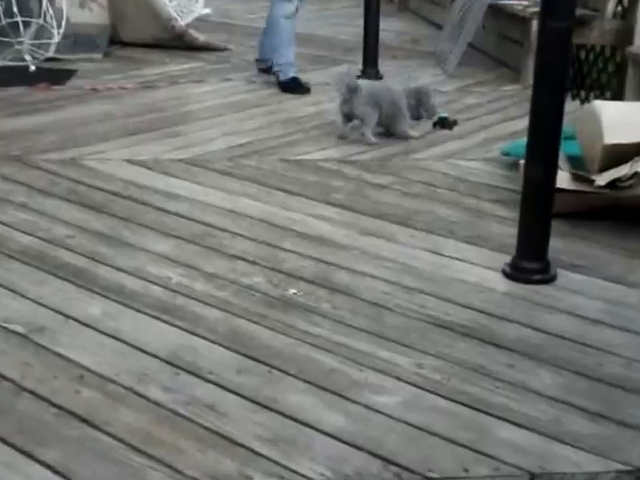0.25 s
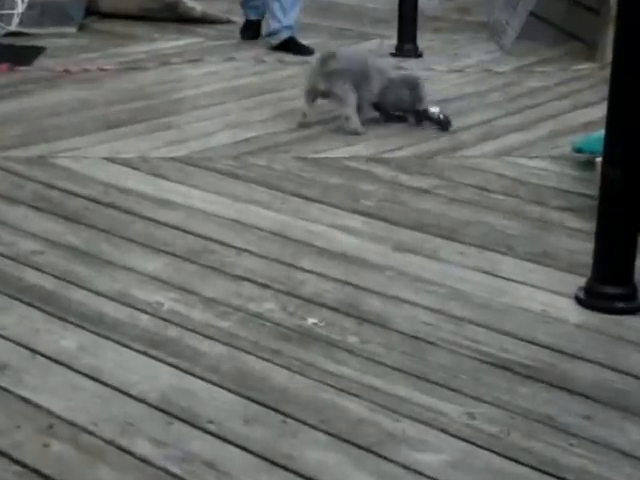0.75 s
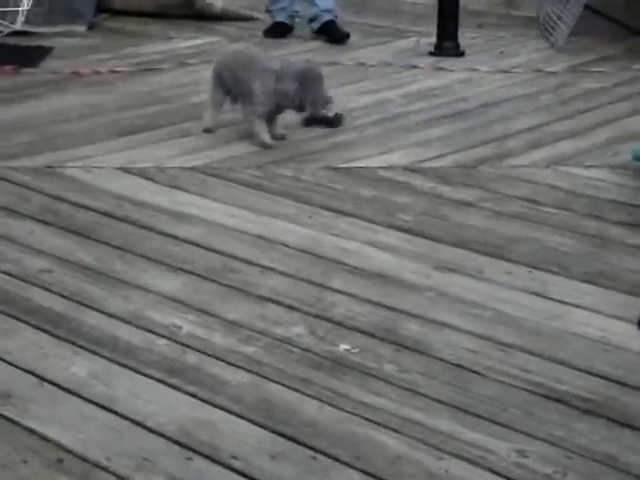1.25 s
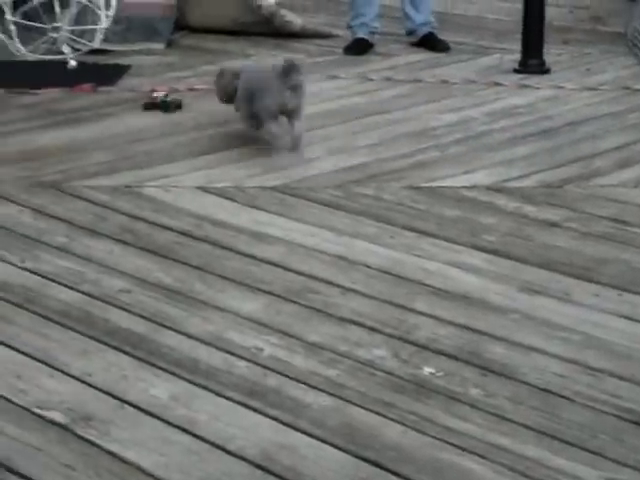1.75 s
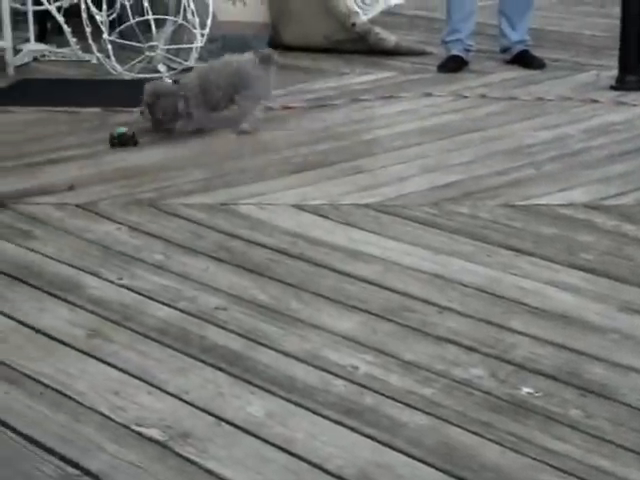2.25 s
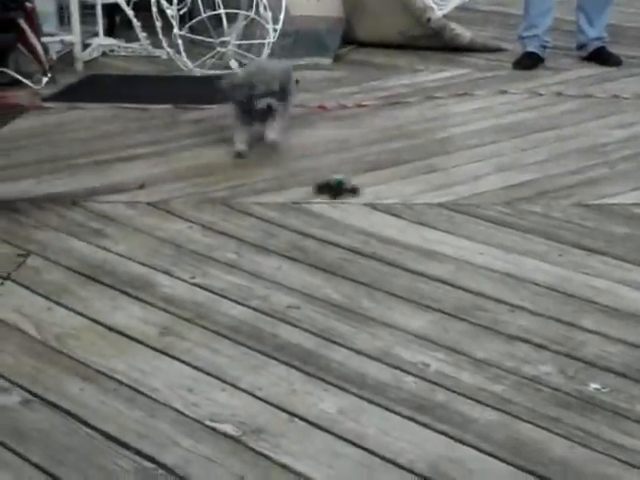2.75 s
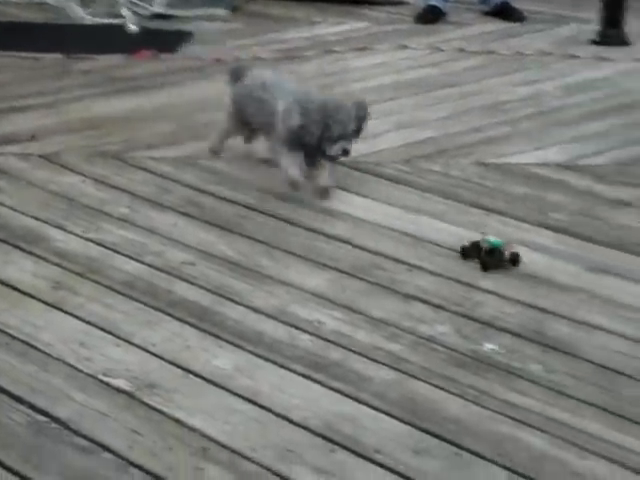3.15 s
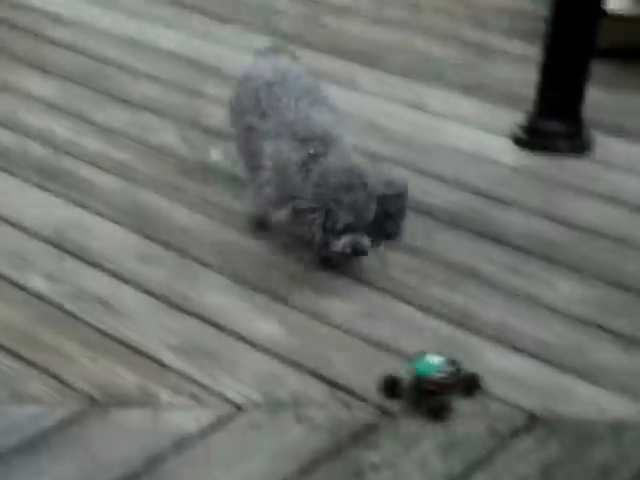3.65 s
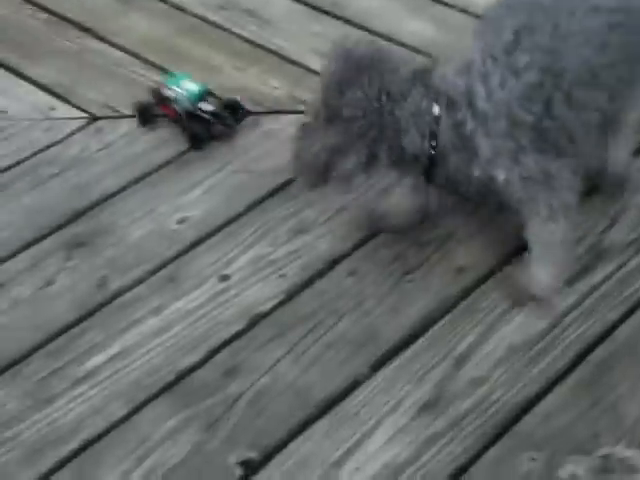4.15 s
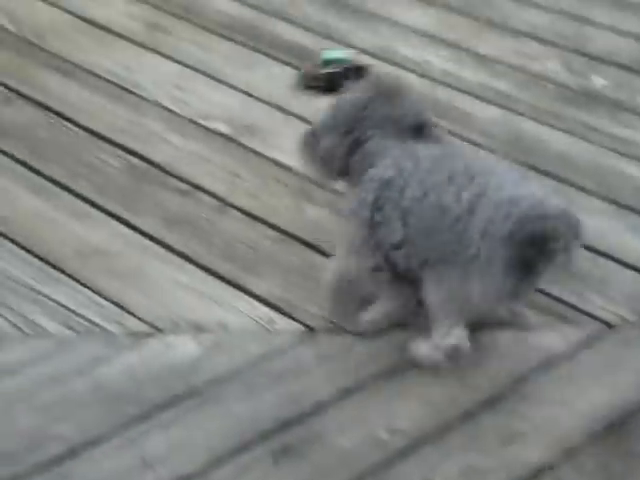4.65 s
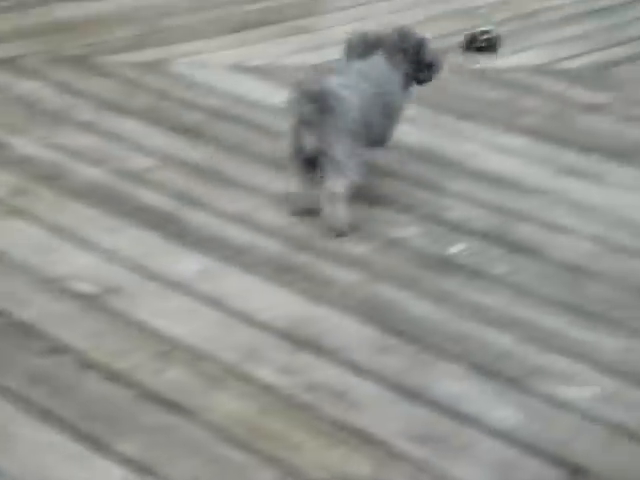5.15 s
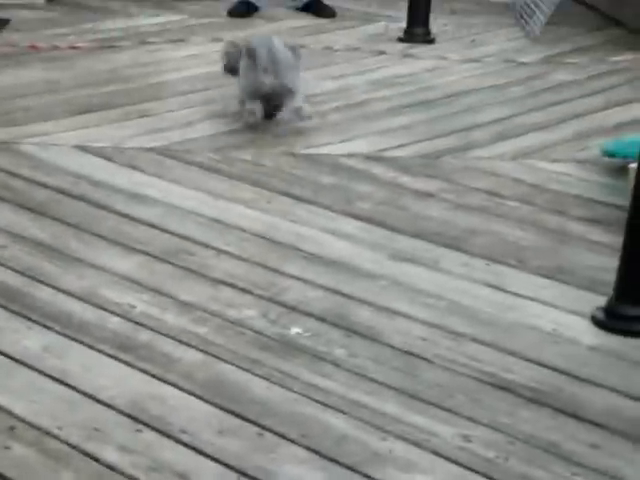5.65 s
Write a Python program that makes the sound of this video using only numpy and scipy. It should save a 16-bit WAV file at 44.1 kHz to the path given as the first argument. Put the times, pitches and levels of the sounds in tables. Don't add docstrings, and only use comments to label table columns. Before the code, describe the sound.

High, bright barks in quick twos over the whirring, clattering run of a small motorized toy on a wooden deck, with overloaded, wind-buffeted sound.

```python
import sys
import numpy as np
from scipy import signal
from scipy.fft import rfft, irfft
from scipy.io import wavfile
from scipy.ndimage import uniform_filter1d

SR = 44100
rng = np.random.default_rng(int(sys.argv[2]) if len(sys.argv) > 2 else 0)


def persist_wave(psi):
    counts = np.round(np.clip(psi, -1, 1) * 32767).astype(np.int16)
    wavfile.write(sys.argv[1], SR, np.atleast_2d(counts).T)


def gain_from_db(level_db):
    decades = np.asarray(level_db, float) / 20
    return 10 ** decades


N = 259302


def evened(x):
    return x / np.sqrt(np.mean(x ** 2) + 1e-20)


def band(x, lo_hz, hi_hz, order=2):
    return signal.sosfilt(signal.butter(order, [lo_hz, hi_hz], "band", fs=SR, output="sos"), x)


def coloured(points):
    points_hz, points_db = np.transpose(points)
    hz = np.fft.rfftfreq(N, 1 / SR)
    gain = gain_from_db(np.interp(np.log(hz + 1), np.log(points_hz), points_db, -90, -90))
    return evened(irfft(rfft(rng.standard_normal(N)) * gain, N))


def drift(count, size):
    return evened(uniform_filter1d(uniform_filter1d(rng.standard_normal(count), size), size))


def add(mix, s, sound):
    part = mix[round(s * SR):][:len(sound)]
    part += sound[:len(part)]


def resonate(x, hz, width_hz):
    turn = np.exp(2j * np.pi * np.cumsum(hz * np.ones(len(x))) / SR)
    r = np.exp(-np.pi * width_hz / SR)
    return 2 * (turn * signal.lfilter([1 - r], [1, -r], x / turn + 1e-18)).real


def swells(events):
    t = np.arange(N) / SR
    return sum(db * np.exp(-((t - s) / length_s) ** 2) for s, db, length_s in events)


# middle in seconds, rise over the breeze in dB, length in seconds.
GUSTS = [(.1, 15, 0.23), (.54, 17, 0.17), (.77, 11.5, 0.08), (.97, 20, 0.14), (1.15, 11, 0.091),
         (1.32, 14.5, 0.038), (1.5, 12.5, 0.083), (1.72, 4, .05), (2.1, 11, 0.45), (3.12, 4.5, 0.092),
         (3.3, 6.5, 0.041), (3.53, 12, 0.033), (3.72, 9.5, 0.15), (4.6, 5, 0.13), (5.0, 5, 0.073),
         (5.35, 5.5, 0.066), (5.77, 4, 0.05)]


def wind():
    wind_db = -36.5 + swells(GUSTS)
    rumble = band(rng.standard_normal(N), 11.0, 86) * gain_from_db(0.5 * drift(N, size=2000))
    return gain_from_db(wind_db - 6.55) * evened(rumble)


# middle in seconds, rise over the rumble in dB, length in seconds.
PAWS = [(.06, -3, 0.11), (.67, 2.5, 0.2), (.89, -1, 0.03), (1.2, 4.5, 0.046), (1.54, 2.5, 0.051),
        (1.7, 9, 0.035), (2.2, 5, 0.045), (2.87, 5, 0.16), (3.2, 5.5, 0.021), (3.45, 5, .06),
        (3.54, 8.5, 0.061), (3.704, 15, 0.051), (3.85, 13, 0.098), (4.682, 20, 0.041), (4.88, 8, 0.14),
        (5.3, 1, 0.31), (5.78, 8, 0.018)]


def planks():
    planks_db = -38 + swells(PAWS)
    drumming = band(rng.standard_normal(N), 110, 262.5) * gain_from_db(1.9 * drift(N, size=500))
    return gain_from_db(planks_db + 0.5) * evened(drumming)


# middle in seconds, rise in dB, length in seconds.
HUM_SWELL = (1.05, 18, .3)


def plank_hum():
    return gain_from_db(-50.5 + swells([HUM_SWELL])) * evened(resonate(rng.standard_normal(N), 108, 12))


# frequency in Hz, level in dB per Hz.
WHEELS = [(300, -26.5), (450, -9), (700, -10.5), (1200, -5), (1700, -5), (3000, -5.5), (3700, -19.5),
          (4200, -37)]
# time in seconds, nearness in dB, throttle in dB.
TRUCK_RUN = [(0, -27, -25), (0.051, -25.5, -2), (.54, -23.5, 8.5), (.8, -23, 3.5), (0.931, -22, 4.5),
             (1.25, -21.5, -1.5), (1.34, -23.5, 7), (1.5, -28, 1), (1.72, -28.5, 5.5), (2.16, -32, 3.5),
             (2.87, -29, 8), (3.5, -30.5, 6), (3.898, -27.5, 6), (4.5, -27, 8), (4.62, -23.5, 5),
             (4.85, -28, 9), (5.201, -30, 6), (5.88, -36, 10.5)]


def truck():
    s, *columns = np.transpose(TRUCK_RUN)
    wheels_db, throttle_db = (np.interp(np.arange(N) / SR, s, c) for c in columns)
    gears_db = wheels_db + throttle_db + 2.0 * drift(N, size=1800)

    tooth_hz = 212 * (1 + 0.051 * drift(N, size=3000) + 0.23 * drift(N, size=150))
    tooth_turns = np.cumsum(tooth_hz) / SR
    clicks = 1.0 + np.exp(-(tooth_turns % 1) / 1.6)
    chatter = clicks * gain_from_db(1.3 * drift(N, size=300)) * rng.standard_normal(N)
    housing_hz = 2887 * (1 + 0.034 * drift(N, size=2500))
    gears = resonate(resonate(chatter, housing_hz, 590), housing_hz, 1100)

    wheels = coloured(WHEELS) * gain_from_db(1.5 * drift(N, size=250))
    wheels /= np.std(band(wheels, 600, 2100, order=4))
    return gain_from_db(gears_db - 1.8) * evened(gears) + gain_from_db(wheels_db - 1.36) * wheels


SHELL_HZ = 2900


def knock(s, db, hz, t60_s, low_db):
    t = np.arange(3000) / SR
    grit = rng.standard_normal((2, 3000))
    fall = gain_from_db(-60 * t / max(t60_s, .004)) * np.minimum(t / 0.0013, 1)
    ring = np.sin(2 * np.pi * hz * t) + 0.81 * evened(band(grit[0], 1600, 6100))
    tap = evened(band(grit[1], 420, 1900))
    return s, gain_from_db(db) * fall * (0.96 * ring + gain_from_db(low_db) * tap)


def stray_rattles(mix):
    for chance, size, tune in rng.random((80, 3)):
        s = chance * 80 / 8
        add(mix, *knock(s, -28 + 8 * size, SHELL_HZ * (.9 + .2 * tune), 0.028, -11))


# start in seconds, peak in dB, t60 in seconds, low tap share in dB.
JOLTS = [(0.4324, 4, 0.026, -11), (.45, -1, 0.026, -5.5), (0.525, 3, 0.0087, -18),
         (.9263, -21.5, 0.031, -12), (2.1063, -22, 0.15, -17), (2.174, -18.5, 0.048, -14),
         (2.2133, 0.5, 0.067, -12), (2.6783, 17.5, .03, -19), (2.969, -14.5, 0.086, -28),
         (3.029, -10.5, 0.087, -20), (3.041, -13.5, 0.087, -12.5), (3.8018, -7.5, 0.029, -12),
         (3.8482, 0.5, 0.0072, -13), (3.863, -15.5, 0.016, -40), (4.138, -0.5, 0.044, -20),
         (4.1477, 3, 0.04, -23), (4.1706, 2.5, 0.035, -13.5), (4.3988, 9, 0.014, -17),
         (4.4621, -2.5, .01, -19), (4.649, 0, 0.13, -29.5), (4.6661, 7.5, 0.067, -9.5),
         (4.6878, 7.5, 0.055, -9.5), (4.8005, -9, 0.026, -13), (4.8684, -6.5, 0.014, -28),
         (4.931, -11, 0.044, -12), (5.144, -8, 0.022, -18), (4.7716, -8, 0.08, -15),
         (5.457, -13, 0.021, -26.5), (5.7184, -15.5, 0.13, -14.5), (4.378, -10, 0.03, -5)]


def plank_jolts(mix):
    for s, db, t60_s, low_db in JOLTS:
        add(mix, *knock(s, db, SHELL_HZ * (1 + 0.049 * rng.standard_normal()), t60_s, low_db))


# start in seconds, peak in dB, ring in Hz.
CLAWS = [(0.147, 0.5, 2160), (0.2047, 1.5, 2950), (1.953, -17.5, 2950), (3.7025, -13.5, 2720),
         (4.0596, 0.5, 2300), (4.1247, 0, 3080), (4.419, -9, 2790), (4.624, -7, 2980), (5.0121, -8, 1890),
         (5.0385, -9, 2060), (5.5502, -13, 2900)]


def claw_clicks(mix):
    for s, db, hz in CLAWS:
        add(mix, *knock(s, db, hz, t60_s=0.029, low_db=-10))


# start in seconds, length in seconds, level in dB,
# first pitch in Hz, last pitch in Hz.
SQUEALS = [(0.435, 0.019, -9, 3090, 2910), (0.473, 0.056, -10, 3330, 3440), (0.9, 0.031, -14, 2810, 3110),
           (1.257, 0.076, -15, 2910, 2450), (1.322, .05, -19.5, 2670, 4180),
           (1.829, 0.016, -20.5, 3034, 3020), (2.08, 0.053, -18.5, 2343, 3590),
           (2.899, .04, -20, 3100, 3100), (3.025, 0.04, -15.5, 3030, 3260), (3.849, 0.037, -14, 3130, 3010),
           (4.505, .06, -5.5, 2840, 3740), (4.651, 0.022, 1.5, 2730, 2540),
           (5.267, 0.051, -17.5, 3210, 3160), (5.705, 0.033, -1.5, 2800, 2790)]


def squeals(mix, width_hz=350):
    for s, length_s, db, from_hz, to_hz in SQUEALS:
        noise = rng.standard_normal(SR // 10)[:int(length_s * SR)]
        hz = np.linspace(from_hz, to_hz, len(noise))
        glide = resonate(resonate(noise, hz, width_hz), hz, width_hz)
        add(mix, s, gain_from_db(db) * evened(glide) * np.hanning(len(noise)) * 0.96)


# frequency in Hz, width in Hz, level in dB.
THROAT = [(1156, 845, 16), (2950, 680, 8), (2058, 170, -7.5), (3674, 810, 0.5)]
# time in seconds, pitch in Hz.
BARKS = [
    [(.051, 750), (.057, 741), (.073, 987), (.085, 1185), (.106, 1126), (.124, 1171), (.148, 1034),
     (.178, 814)],
    [(.3, 1001), (.31, 1136), (.327, 1285), (.346, 1457), (.366, 1480), (.391, 1430), (.4, 1126),
     (.427, 937.4)],
    [(2.296, 454.5), (2.322, 882), (2.34, 1118), (2.362, 1405), (2.378, 1522), (2.402, 1520), (2.433, 1482),
     (2.447, 1112), (2.474, 875)],
    [(2.595, 881.4), (2.607, 1125), (2.63, 1351), (2.662, 1290), (2.687, 1321), (2.697, 1022), (2.718, 943),
     (2.74, 839)],
    [(3.93, 507.2), (3.946, 765.6), (3.962, 922), (3.979, 1132), (3.997, 1444), (4.01, 1464), (4.047, 1473),
     (4.065, 1097), (4.088, 793)],
    [(4.207, 707.5), (4.221, 1058), (4.245, 1074), (4.263, 1219), (4.284, 1204), (4.32, 1146),
     (4.348, 1098), (4.368, 943)],
]
# effort in dB, attack in seconds, voice clears after seconds,
# release in seconds, fade in dB.
EFFORTS = [
    (6, .012, 0.11, 0.038, -13),
    (5, .01, 0.0612, 0.047, -6.5),
    (7.5, .045, .07, 0.045, -24.5),
    (7, 0.019, 0.11, 0.042, -18.5),
    (8, .022, .045, 0.024, -12),
    (4.5, 0.014, .055, 0.035, -9),
]
# roughness at onset and held, 0 to 1; brightness at onset and held,
# in dB per octave.
VOICES = [
    (0.11, 0.038, 3, -2),
    (0.42, 0.059, -9.5, 4.5),
    (0.61, .05, 3.5, 3.5),
    (.45, 0.04, 0.5, 3),
    (.7, .03, -4, 0),
    (.6, 0.022, -3.5, 2),
]
# middle in seconds, length in seconds, rise in dB.
DOUBLING = [
    (0.098, 0.014, 19.5),
    (0.329, 0.029, 29),
    (2.423, 0.062, 11),
    (2.638, 0.034, 17.5),
    (4.026, 0.045, 18),
    (4.296, .065, 26.5),
]


def bark(arch, effort, voice, doubling):
    s, pitch_hz = np.transpose(arch)
    top_db, attack_s, clear_s, release_s, fade_db = effort
    onset_rough, held_rough, onset_bright_db, held_bright_db = voice
    middle_s, doubling_s, doubling_db = doubling
    t = np.arange(s[0], s[-1], 1 / SR)
    age = t - s[0]
    hz = np.interp(t, s, pitch_hz)
    shake = drift(9000, size=40)[:len(t)]
    air = rng.standard_normal(9000)[:len(t)]
    waver = [drift(9000, size=600)[:len(t)] for k in range(9)]

    onset_db = -36 * np.clip(1 - age / attack_s, 0, 1)
    release_db = fade_db * np.clip(1 - (s[-1] - t) / release_s, 0, 1)
    effort_db = top_db + onset_db - 11.5 * age + release_db
    held = np.clip((age - clear_s) / 0.023 + 1, 0, 1)
    rough = np.clip(onset_rough + (held_rough - onset_rough) * held, 0, 1)
    bright_db = onset_bright_db + (held_bright_db - onset_bright_db) * held
    half_db = -21 + doubling_db * np.exp(-((t - middle_s) / doubling_s) ** 4)

    turns = np.cumsum(hz * (1 + .25 * rough * shake)) / SR
    closing = 1 - hz / np.maximum.accumulate(hz)
    folds = 0
    for k in range(1, 9):
        partial_db = bright_db * np.log2(k / 2) + half_db * (k % 2) - 21 * (k == 1)
        partial_db = partial_db - 24 * closing * (k == 4) + 0.31 * (k + 4) * waver[k]
        folds = folds + gain_from_db(partial_db) * np.cos(np.pi * k * turns)
    puffs = (0.33 + np.exp(-(turns / 2 % 1) / 0.046)) * air
    drive = (1 - rough) * folds + 3 * rough * puffs

    throat = 0
    for k, (f, width_hz, db) in enumerate(THROAT):
        throat = throat + (-1) ** k * gain_from_db(db) * resonate(resonate(drive, f, width_hz), f, width_hz)
    throat = band(throat, 680, 4700, order=3)
    throat /= np.sqrt(uniform_filter1d(throat ** 2, size=500) + 1e-3)
    breath = gain_from_db(-7.5 - 12 * (0.5 - rough) * held) * evened(band(air[::-1], 2000, 3600))
    chest_db = -5.5 - 300 * np.maximum(age - attack_s, 0)
    chest = gain_from_db(chest_db) * rough ** 2 * evened(band(air, 250, 600))
    level = gain_from_db(effort_db + 0.5 + drift(9000, size=220)[:len(t)])
    return s[0], level * (throat + breath + chest) * signal.windows.tukey(len(t), .08)


# delay in seconds, level in dB, smear in seconds.
ECHOES = [
    (0.032, -21.5, 0.033),
    (0.076, -21, 0.0032),
    (0.096, -30.5, 0.012),
]
# frequency in Hz, level in dB.
PORCH = [(500, -4.5), (850, -10), (1100, 3), (1300, -6.5), (1550, -6.5), (2200, 2.5), (3000, -1),
         (3800, -5.5)]


def deck(x):
    t = np.arange(SR // 2) / SR
    shape = gain_from_db(-60 * t / 0.35) * np.minimum(t / 0.0033, 1)
    shape *= gain_from_db(-11) / np.linalg.norm(shape)
    for s, db, smear_s in ECHOES:
        burst = np.exp(-abs(t - s) / max(smear_s, 1e-3))
        shape += gain_from_db(db) * burst / np.linalg.norm(burst)
    porch_hz, porch_db = np.transpose(PORCH)
    log_hz = np.log(np.fft.rfftfreq(len(t), 1 / SR) + 1)
    colour = gain_from_db(np.interp(log_hz, np.log(porch_hz), porch_db))
    tail = irfft(rfft(shape * rng.standard_normal(len(t))) * colour, len(t))
    return signal.fftconvolve(x, tail)[:N]


def scene():
    dog, knocks = np.zeros(N), np.zeros(N)
    background = wind() + planks() + plank_hum() + truck()
    stray_rattles(knocks)
    plank_jolts(knocks)
    claw_clicks(knocks)
    squeals(knocks)
    for call in zip(BARKS, EFFORTS, VOICES, DOUBLING):
        add(dog, *bark(*call))
    return (dog + knocks + deck(dog + gain_from_db(-5.5) * knocks) + background)[None]


# frequency in Hz, level in dB per Hz.
HISS = [(3000, -14), (4200, -5.5), (4600, 6), (5000, 4.5), (5500, -3.5)]


def camera_noise():
    rumble = gain_from_db(-44) * evened(band(rng.standard_normal(N), 21, 54))
    return rumble + gain_from_db(-51.5) * coloured(HISS)


def gain_control(mic):
    power_db = 10 * np.log10(abs(uniform_filter1d(mic ** 2, size=500)) + 1e-12)
    fall_db = np.arange(N) * 630.0 / SR
    over_db = np.maximum(np.maximum.accumulate(power_db + fall_db) - fall_db + 15, 0)
    grip = np.exp(-1 / (0.0046 * SR))
    return mic / gain_from_db(0.75 * signal.lfilter([1 - grip], [1, -grip], over_db))


def masked_bands(x, under_db=-27, whim_db=4.0, top_hz=5450):
    hz, _, z = signal.stft(x, SR, nperseg=2048)
    power = (abs(z[:1024]) ** 2).reshape(256, 4, -1).sum(1)
    loudest = uniform_filter1d(power, size=5, axis=0).max(0)
    whim = uniform_filter1d(rng.standard_normal(power.shape), size=5, axis=0)
    whim = evened(uniform_filter1d(whim, size=7, axis=1))
    kept = (power > loudest * gain_from_db(under_db + whim_db * whim) ** 2) | (hz[:1024:4, None] < 1350)
    z[:1024] *= np.repeat(kept, 4, axis=0) * (hz[:1024, None] < top_hz)
    return signal.istft(z, SR, nperseg=2048)[1][:N]


def overload(x, smear_db=-10):
    clipped = np.clip(x, -.975, .975)
    spread = uniform_filter1d(uniform_filter1d((x - clipped) ** 2, size=1500), size=1500)
    fizz = band(rng.standard_normal(N), 3400, 6800, order=1)
    return clipped + gain_from_db(smear_db) * np.sqrt(np.maximum(spread - 1e-7, 0)) * fizz


def top_cut(x):
    return signal.sosfilt(signal.butter(12, 15800, fs=SR, output="sos"), x)


def record(dry):
    mic = signal.sosfilt(signal.butter(10, 3850, fs=SR, output="sos"), dry[0])
    ducked = camera_noise() + gain_control(mic)
    clipped = overload(gain_from_db(1.2) * masked_bands(ducked) + .006)
    low_pass = signal.firwin(255, 15800, fs=SR)
    limited = signal.oaconvolve(np.pad(clipped, 127, "reflect"), low_pass, "valid")
    return top_cut(limited[None])


dry = scene()
out = record(dry)
persist_wave(out)
```